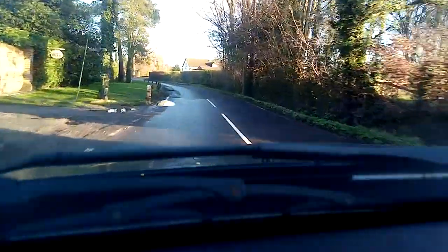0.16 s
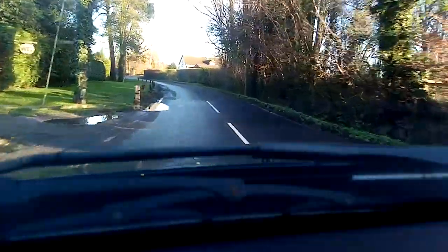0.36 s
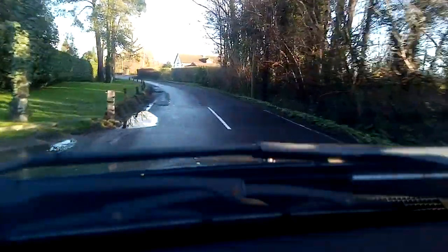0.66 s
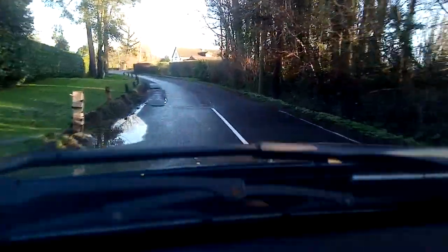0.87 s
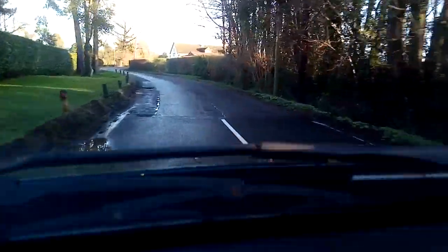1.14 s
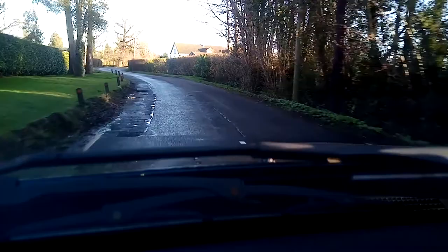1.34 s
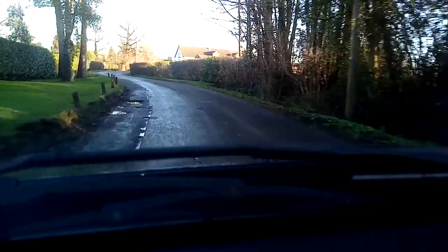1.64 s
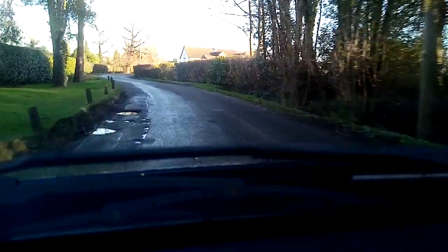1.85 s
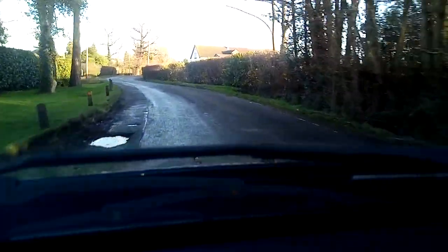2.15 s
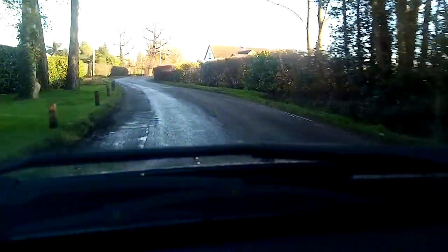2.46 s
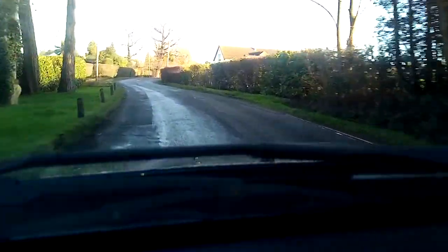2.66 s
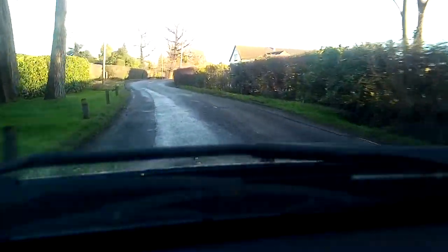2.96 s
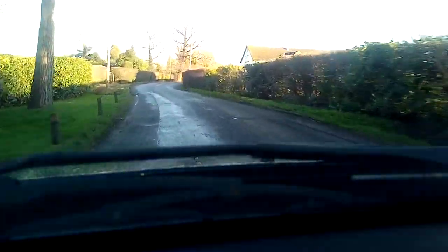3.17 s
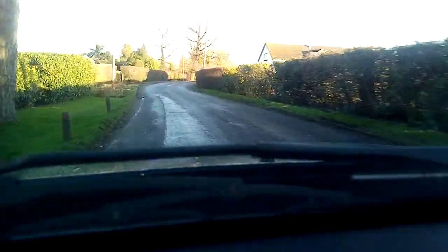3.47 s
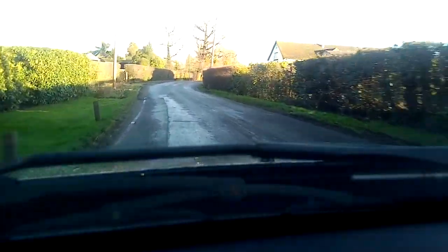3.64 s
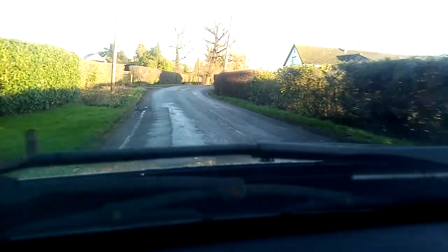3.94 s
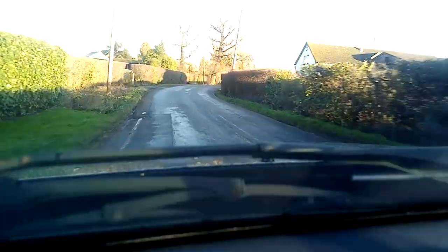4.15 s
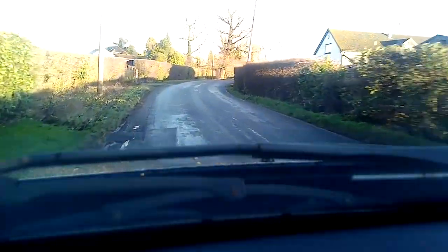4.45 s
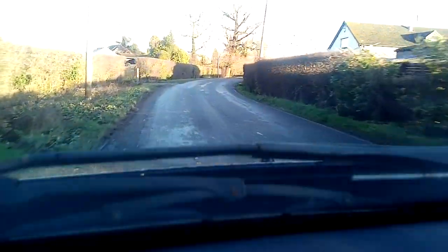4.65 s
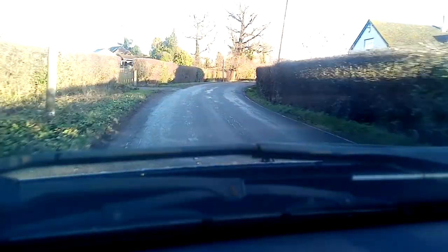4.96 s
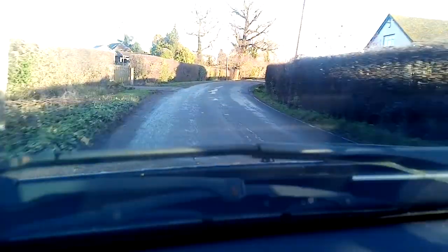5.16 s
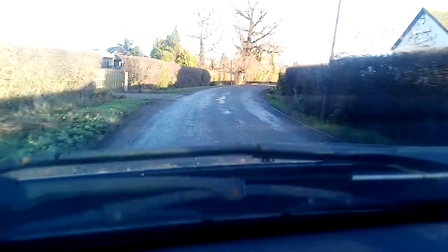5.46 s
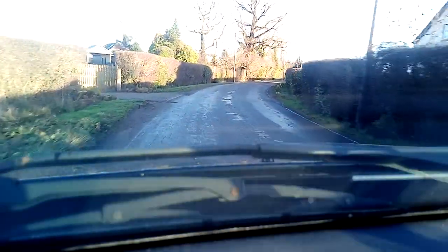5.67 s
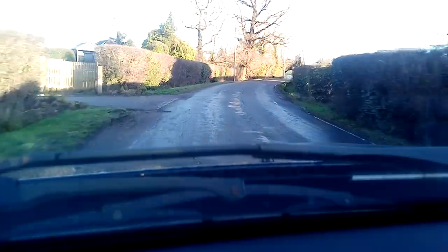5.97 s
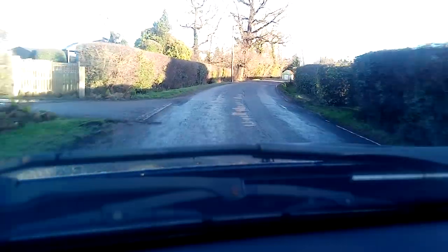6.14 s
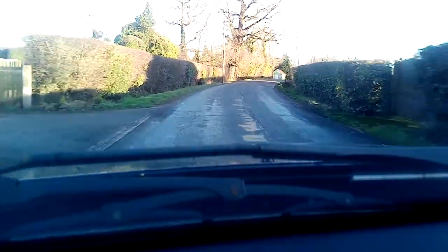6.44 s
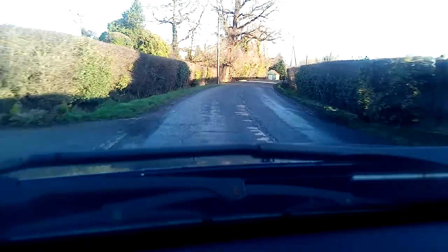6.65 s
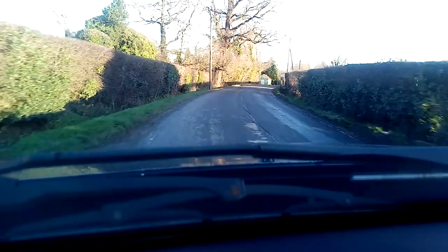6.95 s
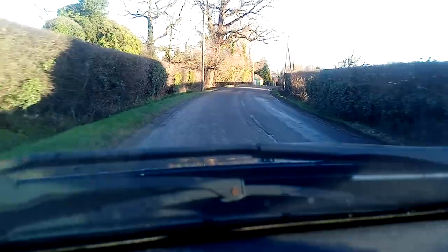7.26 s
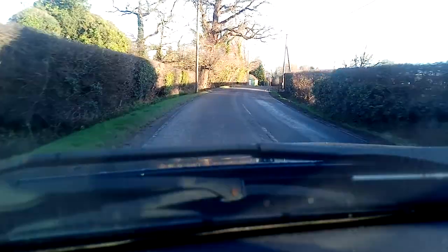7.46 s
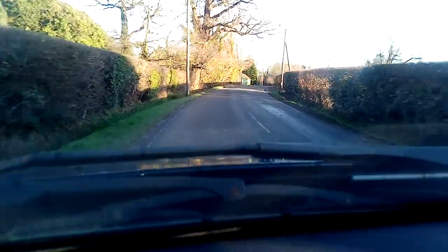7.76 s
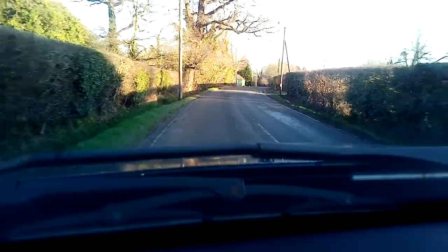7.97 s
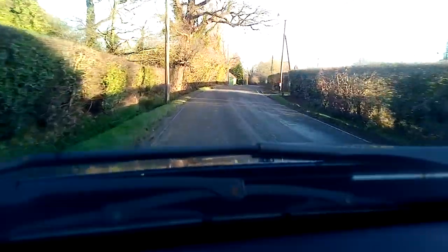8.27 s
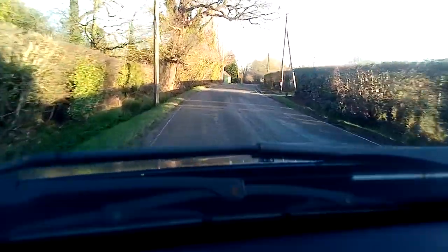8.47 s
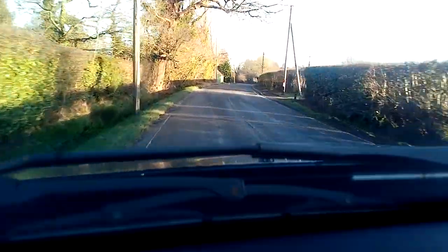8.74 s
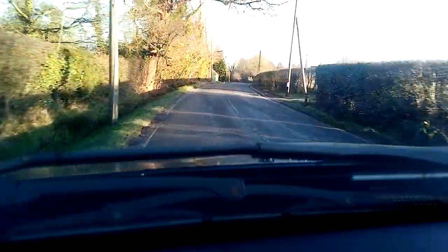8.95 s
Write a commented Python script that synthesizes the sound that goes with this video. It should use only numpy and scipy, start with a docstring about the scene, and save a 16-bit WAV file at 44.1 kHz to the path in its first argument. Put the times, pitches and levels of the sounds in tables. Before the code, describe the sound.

Inside a car on a damp country lane, a deep, muffled body and tyre rumble runs throughout over a faint engine hum. It starts fairly smooth, abruptly grows loud and rough over broken wet tarmac, with spurts of spray, fine sandy crackle and sharp grit clicks on the windscreen. The rumble then eases and gently rises and falls with sparse small ticks. The microphone sits close behind the glass.

```python
"""Car on a damp lane

A car drives along a damp country lane, heard from behind the windscreen.
Shaped noise makes the shaking body and the tyres; sine orders make a faint engine hum; hiss makes the air.
On a broken, wet stretch the rumble swells, noise in spurts rustles as spray, and sand crackles on the glass.
Grit strikes the windscreen as tiny falling chirps; small parts tick with damped rings and trim squeaks.
Thin, very high pings ride on the loudest rumble."""
import sys
import numpy as np
from scipy import signal
from scipy.fft import rfft, irfft, next_fast_len
from scipy.io import wavfile
from scipy.ndimage import uniform_filter1d, minimum_filter1d

SR = 44100
rng = np.random.default_rng(int(sys.argv[2]) if len(sys.argv) > 2 else 0)


def log_audio(samples):
    """Write samples as a 16-bit WAV file to the path given in sys.argv[1]."""
    # one column per channel
    frames = np.atleast_2d(samples).T
    # limit to full scale, then quantise
    limited = np.clip(frames, -1, 1)
    pcm = np.round(limited * 32767).astype(np.int16)
    wavfile.write(sys.argv[1], SR, pcm)


N = 401751
T = np.arange(N) / SR
HZ = np.maximum(np.arange(N // 2 + 1) * SR / N, 1)


def from_db(db):
    """Decibels to gain."""
    return 10 ** (np.asarray(db) / 20)


def rms_one(x):
    """Scale to rms 1."""
    return x / np.sqrt(np.mean(x ** 2) + 1e-20)


def in_time(rows):
    """Interpolate each column of a t/s table at every sample."""
    t_s, *columns = np.transpose(rows)
    return [np.interp(T, t_s, column) for column in columns]


def at_hz(points, hz):
    """Read a spectrum in dB on a log-frequency axis."""
    points_hz, points_db = np.array(points).T
    return np.interp(np.log(hz), np.log(points_hz), points_db)


def ramp(start_s, length_s):
    """Rise from 0 to 1 and stay there."""
    return np.clip((T - start_s) / length_s, 0, 1)


def swells_db(rows):
    """Sum of Gaussian swells or dips; one curve per column of lifts."""
    return sum(np.outer(lifts_db, np.exp(-((T - t_s) / half_s) ** 2)) for t_s, half_s, *lifts_db in rows)


def passband(low_hz, high_hz):
    """Gain of a steep band-pass at each frequency."""
    return 1 / np.sqrt((1 + (low_hz / HZ) ** 20) * (1 + (HZ / high_hz) ** 20))


def noise(gain):
    """Gaussian noise of rms 1 with the given gain at each frequency."""
    size = next_fast_len(N)
    shape = np.interp(np.arange(size // 2 + 1) * SR / size, HZ, gain)
    return rms_one(irfft(rfft(rng.standard_normal(size)) * shape, size)[:N])


def drift(rate_hz):
    """Slow random curve of spread 1, low-passed at rate_hz."""
    step = 40  # samples between drawn points
    size = next_fast_len(N // step + 2)
    hz = np.arange(size // 2 + 1) * SR / step / size
    slow = rms_one(irfft(rfft(rng.standard_normal(size)) / (1 + (hz / rate_hz) ** 4), size))
    return np.interp(np.arange(N) / step, np.arange(size), slow)


def held_even(x, even_s):
    """Rms 1 over every stretch of about even_s."""
    size = max(int(even_s * SR), 1)
    power = uniform_filter1d(uniform_filter1d(x * x, size), size)
    return x / np.sqrt(power + 1e-9)


def gathered(x, pitch, share, width_hz):
    """Part of a vibration gathers round one loose, moving pitch."""
    centre_hz, = in_time(pitch)
    carrier = np.exp(2j * np.pi * np.cumsum(centre_hz) / SR)
    focus = np.real((drift(width_hz) + 1j * drift(width_hz)) * carrier)
    return np.sqrt(1 - share) * x + np.sqrt(share) * focus


def add(out, t_s, sound):
    """Mix a short sound in at t_s."""
    i = max(round(t_s * SR), 0)
    out[i:i + len(sound)] += sound[:N - i]


# road noise let through by the body: f/Hz, relative density/dB per Hz
CABIN_SLOPE = [(12, -37.5), (23, -32), (33, -11), (48, -3), (100, -7.5), (165, -10.5), (245, -16),
               (400, -22), (650, -27.5), (1000, -38), (1500, -47.5), (1650, -56), (1760, -60), (1825, -75),
               (2400, -100)]
# cabin and panel resonances: f/Hz, width/Hz, lift/dB
CABIN_MODES = [(84, 19, 0.5), (107, 13, 2), (136, 21, 3.5), (142, 29, 1), (201, 44, 3), (275.1, 27, 5.5),
               (302.3, 34, 9), (339.3, 66, 6.5), (487, 59, 4.5), (569, 60, 2.5), (672, 86, 2.5),
               (820, 47, 2.5), (1015, 61, 4.5), (1116, 45, -3.5), (1189, 70, 7), (1310, 57, 3.5),
               (1396, 33, 9.5), (1462, 35, -1.5)]


def cabin_gain():
    """The body muffles the treble; air and panel resonances stand out of the slope."""
    lifts_db = sum(db / (1 + (2 * (HZ - hz) / width_hz) ** 2) ** 2 for hz, width_hz, db in CABIN_MODES)
    return from_db(at_hz(CABIN_SLOPE, HZ) + lifts_db)


def vibration(cabin, low_hz, high_hz, even_s):
    """Random vibration held steady in one range of the cabin's response."""
    return held_even(noise(cabin * passband(low_hz, high_hz)), even_s)


# roughness of the lane: t/s, level above smooth tarmac/dB
ROUGHNESS = [(0, 4), (.3, -1), (.49, -3), (.68, 0), (1.25, -0.5), (1.76, -2), (1.86, 11), (2.25, 12),
             (2.75, 12.5), (3.2, 11), (4.2, 9.5), (4.6, 6.5), (5.0, 4), (6.1, 5), (6.7, 8.5), (7.7, 8),
             (8.35, 4), (9.11, 6)]
# smooth tarmac gives way to coarse chippings
COARSE_FROM_S, CROSSING_S = 1.8, 0.052


def response_db(part):
    """A part's level follows the lane's roughness and steps where the chippings begin."""
    roughness_db, = in_time(ROUGHNESS)
    coarse = ramp(COARSE_FROM_S, CROSSING_S)
    return part["db"] + part["follows"] * roughness_db + part["coarse_db"] * coarse


# response to the road: db = level on smooth tarmac/dB, follows = share of roughness/(dB/dB),
# coarse_db = step on the chippings/dB
SHAKE_RESPONSE = dict(db=-36, follows=1.13, coarse_db=-3.5)
BOOM_RESPONSE = dict(db=-30, follows=0.98, coarse_db=0.75)
DRONE_RESPONSE = dict(db=-35, follows=0.64, coarse_db=2)
# centre of the wandering floor boom: t/s, f/Hz
BOOM_PITCH = [(0, 101.8), (2.35, 105.1), (2.95, 75), (3.751, 101), (5.15, 103.2), (5.8, 125), (6.9, 86),
              (7.45, 90), (7.799, 100.3)]
# centre of the wandering panel drone: t/s, f/Hz
DRONE_PITCH = [(0, 150.9), (1.299, 182.3), (3.0, 193.1), (4.6, 170.4), (5.399, 145.2), (7.7, 147.4),
               (8.299, 171.4), (9.11, 180)]


def road(cabin, shake_lift_db, drone_lift_db):
    """Bumps shake the suspension, boom in the floor and set the panels droning."""
    shake = vibration(cabin, low_hz=12, high_hz=65, even_s=0.048)
    shake = from_db(response_db(SHAKE_RESPONSE) + shake_lift_db) * shake

    floor = vibration(cabin, low_hz=69, high_hz=141.5, even_s=0.28)
    floor = gathered(floor, BOOM_PITCH, share=0.41, width_hz=8.5)
    boom = from_db(response_db(BOOM_RESPONSE)) * held_even(floor, even_s=0.29)

    panels = vibration(cabin, low_hz=142, high_hz=262, even_s=0.14)
    panels = gathered(panels, DRONE_PITCH, share=0.15, width_hz=12)
    drone = from_db(response_db(DRONE_RESPONSE) + drone_lift_db) * held_even(panels, even_s=0.26)
    return shake + boom + drone


# response to the road: db = level on smooth tarmac/dB, follows = share of roughness/(dB/dB),
# coarse_db = step on the chippings/dB
ROAR_RESPONSE = dict(db=-40, follows=0.089, coarse_db=2)
RUSH_RESPONSE = dict(db=-50.5, follows=0.24, coarse_db=0.84)
# tyre hum per patch of surface, before HUM_TRIM_DB: t/s, level/dB
HUM_LEVEL = [(0.01, -34.5), (0.15, -32), (0.36, -38), (0.5, -31.5), (0.57, -38), (0.66, -30.5),
             (0.79, -36.5), (1.3, -33), (1.53, -38.5), (2.02, -28.5), (2.2, -32), (2.39, -29), (2.5, -33.5),
             (2.67, -32.5), (2.77, -26), (3.27, -32.5), (3.52, -29.5), (3.85, -33.5), (3.96, -28.5),
             (4.54, -30), (4.68, -34.5), (5.34, -31.5), (5.74, -35), (5.86, -32.5), (6.3, -28.5),
             (6.75, -29), (6.91, -35), (7.12, -29.5), (7.89, -30), (8.26, -33.5), (9.1, -29.5)]
# tread whirr, before WHIRR_TRIM_DB; also steers rush, fringe and air: t/s, level/dB
WHIRR_LEVEL = [(0.01, -55), (0.96, -56), (1.32, -56.5), (1.59, -58), (2.08, -54), (2.31, -60), (3.0, -56),
               (3.12, -62.5), (3.21, -53.5), (3.63, -54.0), (4.08, -57.5), (4.92, -55.5), (5.17, -57.5),
               (6.96, -56), (7.83, -57), (9.1, -54.5)]
# brief dips and surges of the tread: mid t/s, half-length/s, roar lift/dB, rush lift/dB, whirr lift/dB
TREAD_PATCHES = [(.66, .06, -3.5, 1, -1.5), (1.875, 0.022, 4.5, 3, -2), (2.0, .07, 4, 0.5, -0.5),
                 (2.19, .05, 2, 2, 1), (2.34, .05, -2.5, -1.5, -6), (2.49, .03, 5, 1, -4),
                 (4.08, .035, -2, -1, -1.5), (4.33, .035, 3.5, 1, 2), (4.62, .046, -0.5, -1.5, -6),
                 (5.59, .04, -0.5, -0.5, -3.5), (5.7, 0.045, 0, -2, 3), (6.35, .07, 1, 4, 0.5),
                 (6.48, .04, -1.5, -6, 1.5), (6.88, .08, 0.5, 1.5, -0.5), (7.09, .03, 1, -7.5, 0),
                 (7.485, .035, -1.5, -4.5, -6), (7.75, .035, -1.5, 3, 1.5), (8.0, .03, -2, -3.5, -1),
                 (8.81, .035, 4, -1.5, 2.5)]
HUM_TRIM_DB, WHIRR_TRIM_DB = -0.24, 0.06
FRINGE_DB = -10.5  # re whirr table
SWISH_DB = 9.5  # re water thrown


def tyres(cabin, flutter_db=2.0, flicker_db=2, grain_db=0.6, roar_share=.06, rush_share=0.32):
    """Carcass hums; tread roars, rushes, whirrs, flutters most in its bright fringe, swishes in the wet."""
    flutter = drift(24)
    hum_db, = in_time(HUM_LEVEL)
    whirr_db, = in_time(WHIRR_LEVEL)
    roar_lift_db, rush_lift_db, whirr_lift_db = swells_db(TREAD_PATCHES)

    hum = from_db(HUM_TRIM_DB + hum_db) * vibration(cabin, low_hz=259, high_hz=423, even_s=0.11)

    roar_db = response_db(ROAR_RESPONSE) + roar_lift_db
    roar_db = roar_db + roar_share * (hum_db - hum_db.mean()) + grain_db * flutter
    roar = from_db(roar_db) * vibration(cabin, low_hz=398, high_hz=792, even_s=0.089)

    rush_db = response_db(RUSH_RESPONSE) + rush_lift_db
    rush_db = rush_db + rush_share * (whirr_db - whirr_db.mean()) + .5 * flutter_db * flutter
    rush = from_db(rush_db) * vibration(cabin, low_hz=810, high_hz=1220, even_s=.15)

    whirr = noise(cabin * passband(low_hz=1200, high_hz=1630))
    whirr = held_even(from_db(flutter_db * (flutter + drift(17))) * whirr, even_s=0.13)
    whirr = from_db(WHIRR_TRIM_DB + whirr_db + whirr_lift_db) * whirr

    flicker = 1.5 * drift(14) + 1.6 * flutter
    fringe_db = FRINGE_DB + whirr_db + whirr_lift_db + flicker_db * flicker
    fringe = from_db(fringe_db) * vibration(cabin, low_hz=1530, high_hz=1850, even_s=.3)

    swish = vibration(cabin, low_hz=820, high_hz=1700, even_s=.3)
    swish = from_db(SWISH_DB) * water_thrown() * swish
    return hum + roar + rush + whirr + fringe + swish


# engine orders: multiple of firing rate, rms level/dB
ENGINE_ORDERS = [(1, -41), (2, -40.5), (3, -49), (6, -46)]
FIRING_HZ, EXCESS_HZ, SETTLE_S = 50.7, .7, .8  # cruise, excess at the start, time constant


def engine(waver_db=2.0, wander=.01):
    """Low orders of the firing rate, which settles to a cruise; each wavers in strength."""
    firing_hz = FIRING_HZ + EXCESS_HZ * np.exp(-T / SETTLE_S)
    phase = 2 * np.pi * np.cumsum(firing_hz * (1 + wander * drift(4))) / SR
    hum = np.zeros(N)
    for order, db in ENGINE_ORDERS:
        gain = np.sqrt(2) * from_db(db + waver_db * drift(4.6))
        hum += gain * np.sin(round(order) * phase + rng.uniform(0, 2 * np.pi))
    return hum


# air hiss: f/Hz, relative density/dB per Hz
AIR_COLOUR = [(900, -6), (2000, 1), (2750, -0.5), (4000, -7.5), (6000, -13), (8000, -19.5), (13000, -20),
              (15500, -16.5)]
AIR_DB = -74.5


def air(flutter_db=0.8, eddy_db=2.0, whirr_share=0.41, count=4):
    """A faint hiss of air round the glass; its lower ranges flutter in eddies of their own."""
    colour = from_db(at_hz(AIR_COLOUR, HZ))
    whirr_db, = in_time(WHIRR_LEVEL)
    edges_hz = [900, *np.geomspace(2050, 5000, count), SR / 2]
    hiss = np.zeros(N)
    for low_hz, high_hz in zip(edges_hz, edges_hz[1:]):
        band = colour * passband(low_hz, high_hz)
        eddies = from_db(eddy_db * drift(30)) if high_hz < SR / 2 else 1
        hiss += np.linalg.norm(band) * noise(band) * eddies
    level_db = AIR_DB + whirr_share * (whirr_db - whirr_db.mean()) + flutter_db * drift(25)
    return from_db(level_db) * rms_one(hiss)


# faint squeaks of the trim: t/s, f/Hz, level/dB, length/s
SQUEAKS = [(0.112, 2710, -72, 0.043), (0.134, 2240, -73, .04), (8.245, 2720, -72.5, 0.035),
           (8.354, 3060, -70, 0.02)]


def squeaks(width_hz=90):
    """Plastic rubs on plastic: short, rough whistles of narrow noise."""
    out = np.zeros(N)
    for t_s, hz, db, length_s in SQUEAKS:
        swell = np.sin(np.pi * ramp(t_s, length_s))
        out += from_db(db) * swell * noise(1 / (1 + ((HZ - hz) / width_hz) ** 2))
    return out


# wet stretch; the tyres take time to wet and to dry
WET_FROM_S, WET_UNTIL_S, WETTING_S, DRYING_S, SPRAY_DB = 1.79, 2.9, 0.082, .15, -72.5
# short bursts of rustle: peak t/s, level/dB
BURSTS = [(1.97, -64), (2.06, -59.5), (2.175, -60), (2.535, -68), (2.765, -63.5), (2.82, -70), (3.145, -65),
          (3.21, -64), (3.335, -66), (3.39, -69), (3.465, -56), (3.505, -69), (3.561, -66.5), (3.85, -68.5),
          (3.925, -63), (3.98, -70), (4.245, -69)]
BURST_ATTACK_S, BURST_DECAY_S = 0.023, 0.066


def water_thrown():
    """Level of steady spray over the wet stretch, plus a quick, dying burst of rustle at each listed time."""
    drying = np.exp(-np.maximum(T - WET_UNTIL_S, 0) / DRYING_S)
    steady = from_db(SPRAY_DB) * ramp(WET_FROM_S, WETTING_S) * drying
    power = steady ** 2
    for t_s, db in BURSTS:
        decay = np.exp(-np.maximum(T - t_s, 0) / BURST_DECAY_S)
        burst = from_db(db) * ramp(t_s - BURST_ATTACK_S, BURST_ATTACK_S) * decay
        power += burst ** 2
    return np.sqrt(power)


# spray heard through the body: f/Hz, relative density/dB per Hz
SPRAY_COLOUR = [(1000, -8), (1600, 9.5), (2400, 0.5), (3700, -10), (4700, -8.5), (6500, -19), (9000, -28)]


def spray(spurt_db=2.5, patter_db=4.0, count=6):
    """Water thrown into the wheel arches: a muffled rustle in spurts, each range pattering on its own."""
    colour = from_db(at_hz(SPRAY_COLOUR, HZ))
    edges_hz = np.geomspace(1300, 9000, count + 1)
    rustle = np.zeros(N)
    for low_hz, high_hz in zip(edges_hz, edges_hz[1:]):
        band = colour * passband(low_hz, high_hz)
        rustle += np.linalg.norm(band) * noise(band) * from_db(patter_db * drift(70))
    return water_thrown() * rms_one(rustle * from_db(spurt_db * drift(70)))


# what the glass passes on, for sand and grit: f/Hz, gain/dB
GLASS = [(250, -15.5), (430, -8), (600, 0.5), (770, -2), (1000, -9.5), (1300, -0.5), (2000, -3.5),
         (2900, -9.5), (3800, -17), (4300, -9), (5050, -19), (5550, -26.5), (6000, -15.5), (6500, -14.5),
         (6800, -30.5), (7200, -17.5), (9500, -20), (12300, -36.5), (13600, -30), (14700, -16.5),
         (16000, -20)]
SAND_PER_S, SAND_DB = 60, 2.5  # mean grain rate; smallest grain's peak re water_thrown()


def sand(spread_db=2.5, size=256):
    """Tiny grains of uneven size crackle on the glass, following the level of the rustle."""
    hz = np.maximum(np.arange(size // 2 + 1) * SR / size, 1)
    tick = np.roll(irfft(from_db(at_hz(GLASS, hz))), size // 2)
    excess_db = spread_db * np.minimum(rng.exponential(1, N), 3)
    sizes = from_db(SAND_DB + excess_db) * rng.choice([-1, 1], N)
    hits = rng.random(N) < SAND_PER_S / SR
    return signal.fftconvolve(hits * sizes * water_thrown(), tick / tick.max())[:N]


# ticks of gravel and loose trim: t/s, peak level/dB, f/Hz, chatter decay/s
TICKS = [(1.897, -61, 4350, 0.0044), (2.188, -44, 2700, .008), (2.209, -47, 3120, 0.0043),
         (2.423, -58, 4560, .008), (2.592, -59.5, 3500, .002), (2.689, -57.5, 4500, .001),
         (2.789, -56, 2910, .001), (2.811, -59.5, 4670, 0.0075), (3.243, -47, 2400, .014),
         (3.329, -58.5, 5400, .006), (3.455, -46, 2970, .005), (3.465, -54, 4450, .005),
         (3.4755, -44, 5900, .002), (3.496, -54, 2300, 0.0065), (3.531, -55.5, 3200, .002),
         (3.557, -59, 4600, .009), (3.846, -56, 4700, .01), (4.253, -63, 4450, .008),
         (4.954, -55.5, 2430, .008), (5.244, -59.5, 4850, 0.0043), (5.489, -62, 3050, .003),
         (5.819, -54, 4300, .003), (6.066, -63, 4500, .008), (6.531, -56, 4470, .003),
         (7.022, -60, 3330, .006), (7.609, -60, 4270, .003)]
# what a tick rings with: multiple of its f, level/dB, t60/s
TICK_MODES = [(.58, -10, .005), (.77, -12, .005), (1, 1.5, .008), (1.16, -8.5, .004), (1.381, -10, 0.0037)]


def ticks(size=2048, chatter_db=-17):
    """A sharp contact, then a brief chatter; each small piece rings at its own pitch."""
    out, t = np.zeros(N), np.arange(size) / SR
    for t_s, db, hz, chatter_s in TICKS:
        contact = from_db(chatter_db) * rng.standard_normal(size) * np.exp(-t / chatter_s)
        contact[0] = 1
        body = np.zeros(size)
        for ratio, mode_db, t60_s in TICK_MODES:
            body += from_db(mode_db - 60 * t / t60_s) * np.sin(2 * np.pi * ratio * hz * t)
        tick = signal.fftconvolve(contact, body)[:size]
        add(out, t_s, from_db(db) * tick / np.abs(tick).max())
    return out


# grit on the windscreen: t/s, level/dB, brightness above 2 kHz/dB per octave, body below 1.5 kHz/dB,
# travel scale/s (wave delay = scale * sqrt(1000 / (f + BEND_KNEE_HZ)))
GRIT = [(2.0505, -15, -1, 2, 0.0047), (2.0797, -52, 1, -2, 0.0048), (2.0863, -20.5, -1, 1, 0.007),
        (2.1275, -50, 2, -5, .002), (2.1722, -17, 0, 3, 0.0036), (2.2, -21, -4, 3.5, 0.0054),
        (3.1472, -25.5, -1.5, -2, 0.0068), (3.2269, -22.5, 1.5, 2, 0.0076), (3.7737, -15, -2, 3, 0.0053),
        (3.9205, -19, -3, -0.5, 0.0043)]
BEND_KNEE_HZ = 2323  # below this the waves arrive nearly together
TAIL_T60_S = .035


def grit(size=2048, tail_db=-38, tail_top_hz=5000, edge_db=-16, detour=1.6, detour_spread=.15):
    """High bending waves run faster: each hit chirps down, with an edge echo and a short, dull tail."""
    out, t = np.zeros(N), np.arange(size) / SR
    hz = np.maximum(np.arange(size // 2 + 1) * SR / size, 1)
    lows = 1 / (1 + (hz / 1500) ** 4)
    octaves_up = np.log2(np.maximum(hz / 2000, 1))
    tail = from_db(-60 * t / TAIL_T60_S)  # the dull noise tail dies quickly
    for t_s, db, bright_db, body_db, travel_s in GRIT:
        scatter = rng.standard_normal(size)
        phase = -4j * np.pi * travel_s * np.sqrt(1000 * (hz + BEND_KNEE_HZ))
        echo_path = detour + detour_spread * np.tanh(scatter[-1])
        travel = np.exp(phase) + from_db(edge_db) * np.exp(phase * echo_path)
        blow = 1 + from_db(tail_db) * rfft(tail * scatter) / (1 + (hz / tail_top_hz) ** 2)
        colour = from_db(at_hz(GLASS, hz) + body_db * lows + bright_db * octaves_up)
        tick = irfft(blow * travel * colour)
        add(out, t_s, from_db(db) * tick[:size // 2] / np.abs(tick).max())
    return out


def thin_pings(x, hz=12050, t60_s=.0023, db=0.5, from_level_db=-21.5, size=256, window_s=.25):
    """Faint, very high pings on a 20 ms beat, heard only while the rumble is at its loudest."""
    clicks, t = np.zeros(N), np.arange(size) / SR
    level = np.sqrt(uniform_filter1d(x * x, int(window_s * SR)) + 1e-9)
    excess = np.maximum(level - from_db(from_level_db), 0)
    beat = slice(SR // 100, N, SR // 50)
    clicks[beat] = (x * np.abs(x) / level * excess)[beat]
    ping = np.sin(2 * np.pi * hz * t) * t / t60_s * from_db(-60 * t / t60_s)
    return from_db(db) * signal.fftconvolve(clicks, ping)[:N]


def limiter(x, ceiling=0.32, size=441):
    """The gain dips smoothly round any swing above the ceiling."""
    gain = minimum_filter1d(np.minimum(ceiling / (np.abs(x) + 1e-9), 1), 2 * size + 1)
    return x * uniform_filter1d(uniform_filter1d(gain, size), size)


# bumps, broken patches and lulls: mid t/s, half-length/s, shake lift/dB, drone lift/dB
BUMPS = [(1.37, 0.076, 11, 1), (1.66, 0.072, 5, -2), (1.8, .04, 4, -3), (1.875, .03, 6, 1.5),
         (2.07, .09, 4.5, -2.5), (2.23, 0.064, 3.5, 4), (2.52, 0.043, -5, 1), (3.12, 0.14, 4, 4.5),
         (3.52, 0.06, 1.5, 1), (3.702, 0.55, 1.5, -0.5), (4.381, 0.14, -1, -2.5), (5.101, 0.17, 8.5, 3),
         (5.68, 0.099, -7, 0), (6.35, 0.037, 1.5, 2), (6.5, .07, 4, -2.5), (6.82, .06, 0.5, 1),
         (7.08, .06, -5, -3), (7.28, .07, 3, -3), (7.6, .17, -0.5, 1.5), (7.981, .17, 0.5, 2),
         (8.445, 0.086, 4, -2.5), (8.95, .07, -0.5, 2.5)]


def scene():
    """Everything meets at one microphone by the windscreen."""
    cabin = cabin_gain()
    shake_lift_db, drone_lift_db = swells_db(BUMPS)
    rolling = road(cabin, shake_lift_db, drone_lift_db) + tyres(cabin)
    steady = rolling + engine() + air()
    return (steady + squeaks() + spray() + sand() + ticks() + grit())[None]


def record(dry, low_cut_hz=31, top_cut_hz=16000, fade_s=.006):
    """Cut the deepest bass, hold peaks down, add the thin pings, ease the ends and cut the top."""
    low_cut = signal.butter(8, low_cut_hz, "high", fs=SR, output="sos")
    x = limiter(signal.sosfilt(low_cut, dry))
    to_nearest_end_s = np.minimum(T, T[::-1])
    fade = np.sin(np.pi / 2 * np.minimum(to_nearest_end_s / fade_s, 1)) ** 2
    x = (x + thin_pings(x[0])) * fade
    top_cut = signal.ellip(10, .1, 80, top_cut_hz, fs=SR, output="sos")
    return signal.sosfilt(top_cut, x)


dry = scene()
out = record(dry)
log_audio(out)
```